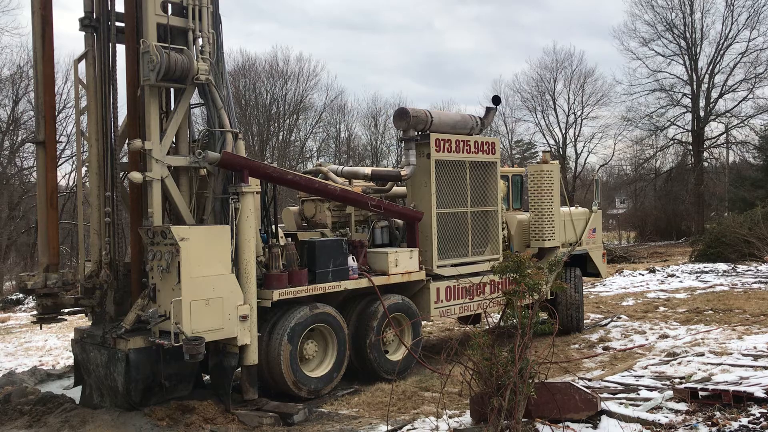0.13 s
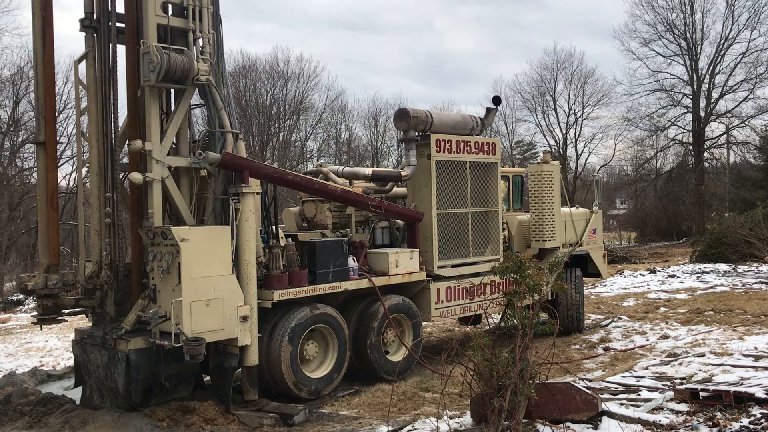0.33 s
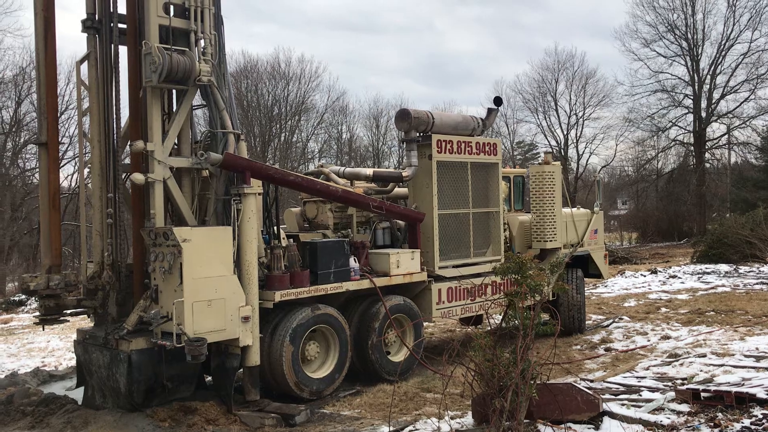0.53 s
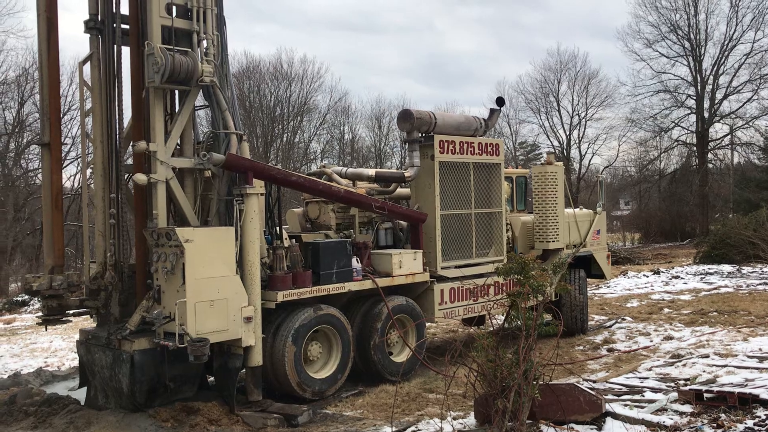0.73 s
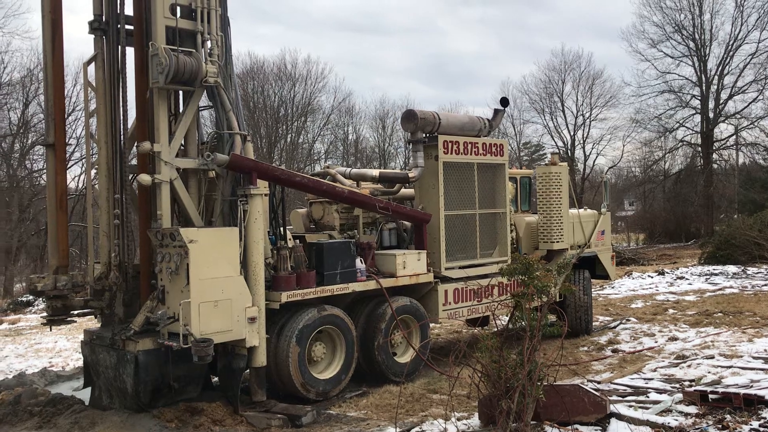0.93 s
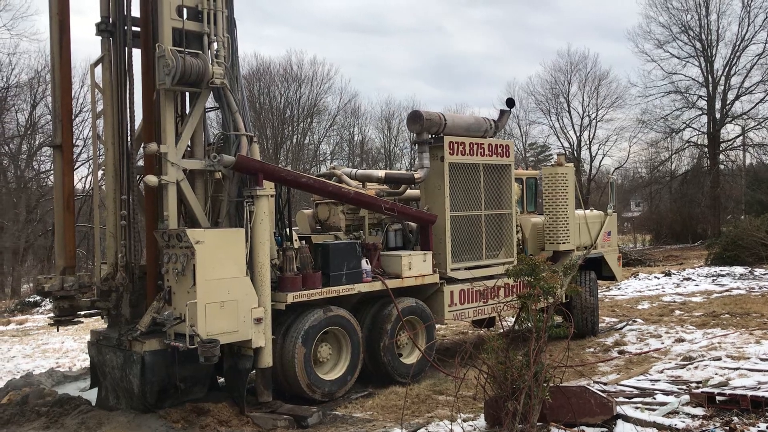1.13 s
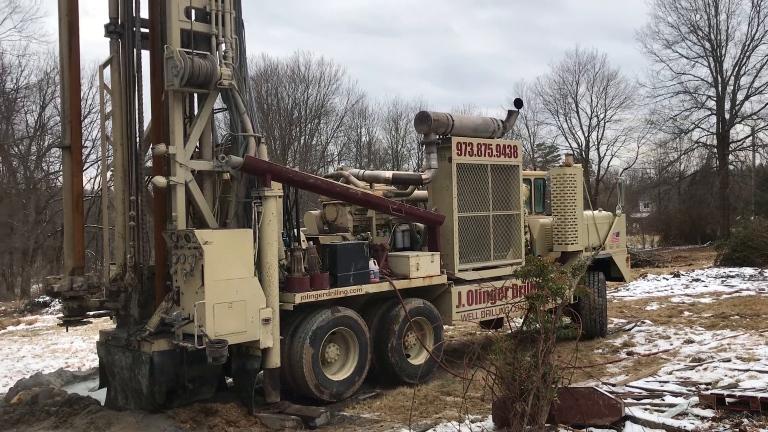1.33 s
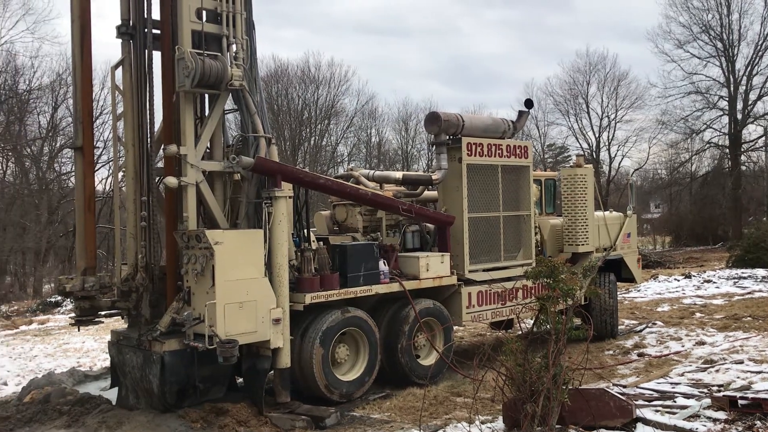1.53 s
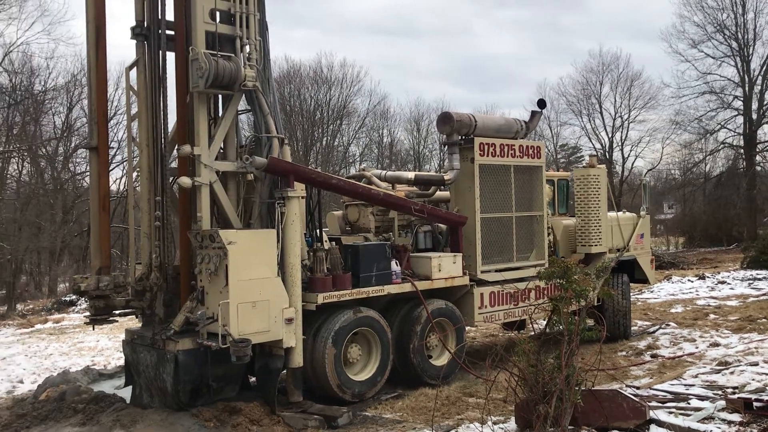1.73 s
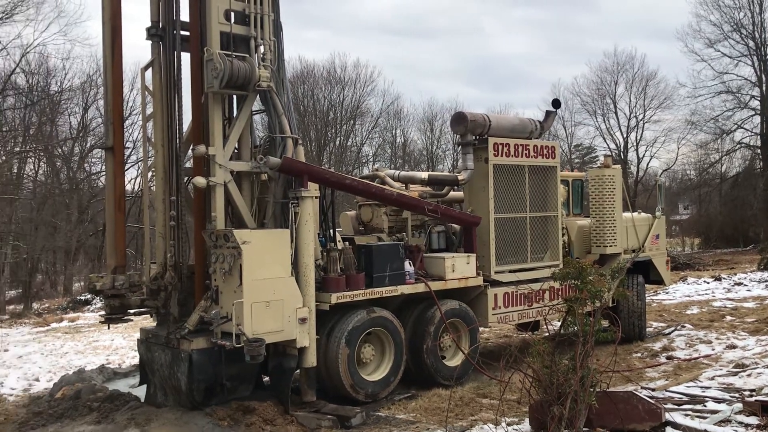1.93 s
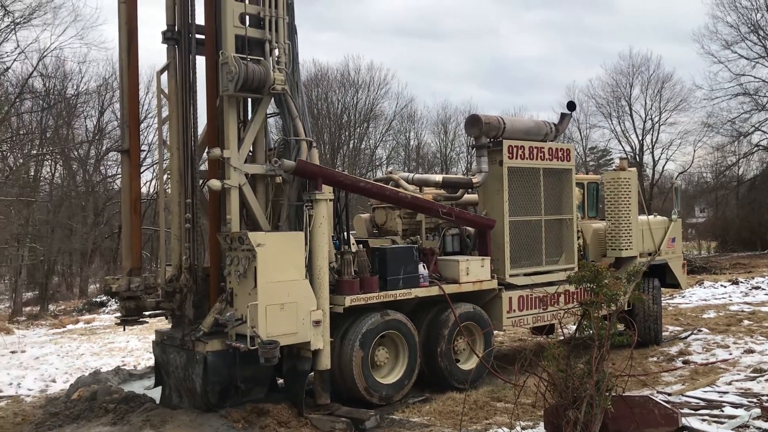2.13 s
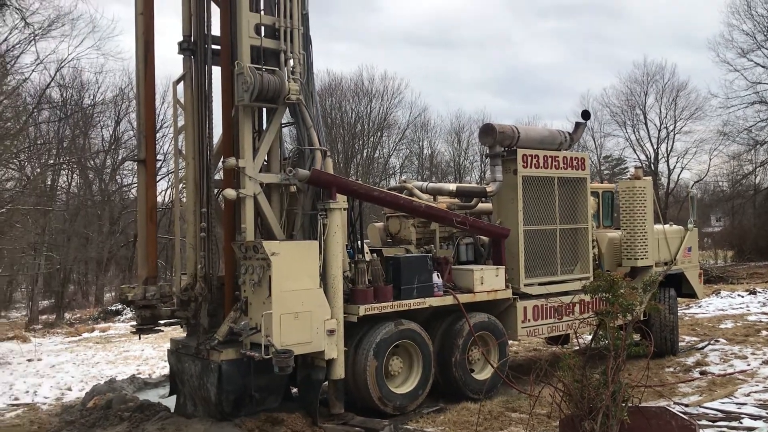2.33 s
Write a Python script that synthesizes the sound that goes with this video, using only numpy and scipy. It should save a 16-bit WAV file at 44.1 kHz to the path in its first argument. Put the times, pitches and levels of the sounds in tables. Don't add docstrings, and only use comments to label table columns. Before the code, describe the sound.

A drill rig's loud diesel drone and broad machinery roar, with steel knocking, ringing and brief squeals

```python
import sys
import numpy as np
from scipy import signal
from scipy.fft import rfft, irfft
from scipy.io import wavfile
from scipy.ndimage import uniform_filter1d

SR = 44100
rng = np.random.default_rng(int(sys.argv[2]) if len(sys.argv) > 2 else 0)


def volts_from_db(level):
    exponent = np.asarray(level, float) / 20
    return 10 ** exponent


def wav_out(sig):
    wavfile.write(sys.argv[1], SR, np.round(np.clip(np.atleast_2d(sig).T, -1, 1) * 32767).astype(np.int16))


N = 110250


def level(x, db):
    return x * volts_from_db(db) / np.sqrt(np.mean(x ** 2))


def walk(rate):
    hold = int(SR / rate)
    steps = np.repeat(rng.standard_normal(N // 200), hold)[:N + hold]
    smooth = uniform_filter1d(uniform_filter1d(steps, hold), hold)
    return 1.328 * smooth[:N]


def ring(x, hz, t60):
    pole = np.exp(2j * np.pi * hz / SR - np.log(1000) / (t60 * SR))
    return signal.lfilter([1], [1, -pole], x).imag


def band(x, hz, width_hz):
    return signal.lfilter(*signal.iirpeak(hz, hz / width_hz, fs=SR), x)


def random_ticks(per_s, spread_db, chance):
    return (chance[0] < per_s / SR) * volts_from_db(-spread_db * np.log(chance[1] + 1e-9))


# (frequency [Hz], spectral level [dB per Hz])
ROAR_SPECTRUM = [(15, -58), (25, -26), (150, -7), (394, -3.5), (655, -4.5), (833, -8), (1090, -8.5),
                 (13800, -21), (15000, -32.5)]
# (frequency [Hz], width [Hz], gain [dB])
BODY_RESONANCES = [(314, 85, 6.5), (412, 180, -6.5), (682, 250, 3), (810, 143, -3), (1190, 560, 5),
                   (2130, 490, -1.5), (2770, 400, 6), (5000, 460, -3.5), (6920, 460, 5), (7800, 140, -4),
                   (10350, 290, -11), (11440, 660, 5), (12600, 1600, -5), (14230, 1340, 9.5)]


def roar(phase):
    swell_db, shared_db, flicker_db = .3, .5, 1
    throb_db, blow_scatter_db, blow_fade_cycles = 2.5, -2, 0.18
    f = np.arange(N // 2 + 1) * SR / N + 1
    hz, db = np.array(ROAR_SPECTRUM).T
    colour = np.interp(np.log(f), np.log(hz), db)
    for hz, width_hz, gain_db in BODY_RESONANCES:
        colour = colour + gain_db * np.exp(-2 * ((f - hz) / width_hz) ** 2)
    spectrum = rfft(rng.standard_normal(N)) * volts_from_db(colour)
    third_octave = 3 * np.log2(f / 20)
    swell = swell_db * walk(3.6)
    shared = [shared_db * walk(19.0) for _ in range(7)]
    puff = uniform_filter1d(np.exp(-phase / blow_fade_cycles), 88)
    throb = throb_db * puff * volts_from_db(blow_scatter_db * walk(18))
    out = 0
    for k in range(31):
        part = irfft(spectrum * np.clip(1 - np.abs(third_octave - k), 0, 1), N)
        throb_share = np.exp(-((k - 20) / 11.7) ** 2)
        out = out + part * volts_from_db(swell + shared[k // 5] + flicker_db * walk(24.63) + throb * throb_share)
    return level(out, -16.5)


def clatter():
    chance = rng.random((3, N))
    ticks = random_ticks(400, 2, chance) * np.sign(chance[2] - .5)
    return level(band(band(ticks, 1300, 1600), 1300, 2400), -28)


# (frequency [Hz], rms level [dB], pitch wander [Hz])
PUMP_TONES = [(111.1, -37.5, .2), (552.83, -29, .05), (558.05, -35.5, .05), (645, -28.5, .5),
              (650, -35, .5), (659.2, -35, .6), (693.6, -34, .2), (710.2, -34, .6), (723, -38, 1),
              (737.8, -38, 1), (439.5, -42, .5), (228, -39, .3), (1096, -37, 1.5), (2265, -38, .6)]


def pumps():
    out = 0
    for hz, db, wander_hz in PUMP_TONES:
        strength = volts_from_db(db + 1.3 * walk(25.1))
        pitch = hz + wander_hz * walk(5.02)
        out = out + strength * np.sqrt(2) * np.sin(2 * np.pi * np.cumsum(pitch) / SR)
    return out


# (time [s], cycle rate [Hz])
ENGINE_SPEED = [(0, 16.85), (.6, 16.875), (1.1, 16.905), (1.5, 16.925), (2.5, 16.93)]
# (multiple of the cycle rate, level [dB])
ENGINE_HARMONICS = [(2, -28), (3, -26), (4, -18), (6, -17.5), (8, -14), (9, 0), (10, -4.5), (11, -15),
                    (12, -2.5), (14, -8), (16, -7), (17, -20), (18, -6), (19, -17), (20, -9), (21, -19),
                    (26, -17), (28, -19)]


def engine():
    pipe_dispersion, pipe_order, pipe_turn = 1.85, 9.503, .74
    echo_share, echo_cycles = .6, .375
    cycle_hz = np.interp(np.arange(N) / SR, *np.array(ENGINE_SPEED).T)
    turn = 2 * np.pi * np.cumsum(cycle_hz) / SR
    out = 0
    for order, db in ENGINE_HARMONICS:
        pipe_lag = pipe_dispersion * (order - pipe_order) ** 2 + pipe_turn
        echo_lag = echo_share * np.cos(2 * np.pi * echo_cycles * (order - 10))
        out = out + volts_from_db(db + walk(5.77)) * np.sin(order * turn + pipe_lag + echo_lag)
    return volts_from_db(-23) * out


def hammer_phase():
    blow_hz, start_s = 29.3, .003
    return (np.cumsum(blow_hz * (1 + .004 * walk(3))) / SR - start_s * blow_hz) % 1


def blow_instants(phase):
    return np.diff(phase, prepend=0) < 0


# (frequency [Hz], rms level [dB], t60 [s])
THUMP_MODES = [
    (673, -32, 0.035),
    (1076, -34, 0.073),
    (1348, -36.5, 0.1),
]


def hammer(phase):
    blows = blow_instants(phase)
    out = 0
    for hz, db, t60 in THUMP_MODES:
        strength = volts_from_db(2.5 * rng.standard_normal(N)) * np.sign(rng.standard_normal(N))
        out = out + level(ring(blows * strength, hz, t60), db)
    return out


def thud(db, hz):
    t = np.arange(SR // 5) / SR
    rise_s, tone_fade_s, t60_s, crack_hz = 0.00067, 0.0031, 0.11, 3270
    noise = rng.standard_normal(len(t))
    body = level(band(noise, hz, 0.51 * hz), 0)
    tone = np.sin(2 * np.pi * hz * t) * np.exp(-t / tone_fade_s)
    crack = level(band(band(noise, crack_hz, 3800), crack_hz, 3800), -11)
    envelope = volts_from_db(db - 10.5 - 60 * t / t60_s) * (1 - np.exp(-t / rise_s))
    return (body + tone + crack) * envelope


# (time [s], level [dB])
ROCK_PRESSURE = [(0.12, -25), (0.42, -24), (0.455, -20), (0.6, -27.5), (0.66, -25), (0.99, -25),
                 (1.11, -23.5), (1.15, -23), (1.77, -26), (1.88, -35), (1.92, -24), (2.29, -23),
                 (2.48, -25.5), (2.5, -34)]
# (time [s], peak level [dB], centre frequency [Hz])
HARD_KNOCKS = [(0.1711, -10, 1070), (0.2057, -5, 1060), (0.2368, -4, 1100), (0.307, -5, 1020),
               (0.3734, -10, 1120), (0.4072, -8.5, 2800), (0.449, -5, 1250), (0.4544, -1, 1400),
               (0.55, -14, 1300), (0.649, -15, 1230), (0.7596, -17, 2690), (0.8213, -6.5, 2400),
               (0.8517, -12, 1150), (0.858, -5.5, 2300), (0.925, -10, 2500), (1.0986, -12, 1160),
               (1.1301, -18, 1100), (1.1646, -2.5, 1030), (1.3024, -13, 1120), (1.3406, -21, 2750),
               (1.3643, -7.5, 1090), (1.4083, -5, 970), (1.4465, -2, 1170), (1.47, -11, 1000),
               (1.5047, -3, 1450), (1.5475, -4.5, 1030), (1.577, -4.5, 1280), (1.7427, -6, 1030),
               (1.777, -4, 1170), (1.9, -4.5, 1220), (1.9815, -9, 1170), (2.011, -5, 1270),
               (2.0478, -5, 1010), (2.1832, -8, 1060), (2.2213, -7.5, 1420), (2.25, -10, 1040),
               (2.322, -9, 1350), (2.353, -18, 1110), (2.3857, -5.5, 1090)]
STRING_HZ = [1437, 1963, 2266, 2280, 2628, 2695, 3372, 3804, 4463, 5362, 5573, 6014, 6112, 8152]
# (level [dB], t60 [s])
STRING_MODES = [(-10, .15), (-13, .2), (-16, .4), (-14.5, .15), (-13, .2), (-13, .3), (-13, .1), (-16, .2),
                (-16, .12), (-18, .25), (-17, .14), (-19.5, .15), (-33, .23), (-21, .2)]
CASING_HZ = [1003, 1200, 1292, 1534, 1665, 1900, 2493, 2869, 3214, 4610, 5042, 5152, 7091, 12040]
# (level [dB], t60 [s])
CASING_MODES = [(-10.5, 0.54), (-12, .15), (-9, 0.15), (-12.5, 0.21), (-13.5, 0.27), (-10.5, 0.059),
                (-10.5, 0.086), (-17.5, 0.33), (-17, 0.098), (-25, 0.12), (-19, 0.24), (-36, .2),
                (-36, 0.086), (-27, .1)]


def drill_string(phase):
    rattle_db, knock_ring_db, wander_db = 1.5, -33, 1.5
    press = np.interp(np.arange(N) / SR, *np.array(ROCK_PRESSURE).T)
    blows = blow_instants(phase) * volts_from_db(12)
    knocks, out = np.zeros(N), np.zeros(N)
    for at, db, hz in HARD_KNOCKS:
        i = int(at * SR)
        knocks[i] = volts_from_db(db)
        hit = thud(db, hz)[:N - i]
        out[i:i + len(hit)] += hit
    for hz, (db, t60) in zip(STRING_HZ + CASING_HZ, STRING_MODES + CASING_MODES):
        chance = rng.random((3, N))
        impacts = random_ticks(1500, 2, chance) + blows
        drive = impacts * (2 * chance[2] - 1) * volts_from_db(press + wander_db * walk(8.24))
        rattle = level(ring(drive, hz, t60), db + rattle_db + np.mean(press))
        knock_ring = volts_from_db(db + knock_ring_db) * ring(knocks * chance[2], hz, t60)
        out = out + rattle + knock_ring
    return out


SQUEAL_ONSETS = [.13, .485, .685, .89, 1.07, 1.6, 2.24, 2.42, .49, .55, .85, 1.6, 1.88, 2, 2.05, 2.21, 2.39,
                 1.44, 2.02, .13, .7, .86, 1.33, 1.95, 2.08, 2.19, .453, 1.47, .47, .65, .94, 1.16, 1.45,
                 .45, .52, .83, .47]
SQUEAL_PITCHES = [6720, 6802, 6802, 6802, 6802, 6790, 6800, 6820, 5575, 5575, 5545, 5575, 5575, 5575, 5575,
                  5575, 5580, 6015, 6015, 8153, 8153, 8153, 8153, 8230, 8153, 8153, 1440, 1450, 2695, 2695,
                  2696, 2697, 2695, 2268, 2265, 2266, 2630]
# (length [s], level [dB])
SQUEAL_BURSTS = [(0.072, -34), (0.048, -30), (0.032, -24), (0.077, -29), (0.042, -25.5), (.18, -41),
                 (0.052, -44), (0.025, -42), (0.03, -32), (.02, -28), (.04, -29), (0.11, -32.5),
                 (0.04, -30), (.025, -33), (0.11, -30), (.06, -37), (0.052, -29), (0.15, -35), (.06, -34),
                 (.12, -40), (0.11, -38.5), (.08, -31), (0.22, -39), (.06, -40), (.05, -39), (0.07, -33),
                 (0.011, -17.5), (0.071, -21), (0.16, -24.5), (0.18, -27), (0.041, -23), (0.055, -20.5),
                 (0.16, -24), (0.035, -21.5), (.24, -29.5), (0.081, -29), (.13, -33)]


def squeal():
    rise_s, fade_s, pair_split, pitch_wander = .015, 0.038, .006, 0.00066
    t, out = np.arange(N) / SR, 0
    for at, hz, (length, db) in zip(SQUEAL_ONSETS, SQUEAL_PITCHES, SQUEAL_BURSTS):
        rise = np.clip((t - at) / min(rise_s, length / 3), 0, 1)
        press = rise * np.exp(-np.clip(t - at - length, 0, None) / fade_s)
        paired = 6500 < hz < 7000
        rough_db = 4 if paired else 1.5
        for side in (-1, 1) if paired else (0,):
            pitch = hz * (1 + side * pair_split + pitch_wander * walk(61.3))
            strength = volts_from_db(db + rough_db * walk(50.65)) * press
            out = out + strength * np.sin(2 * np.pi * np.cumsum(pitch) / SR)
    return out


def scene():
    phase = hammer_phase()
    mix = roar(phase) + clatter() + pumps() + engine() + hammer(phase) + drill_string(phase) + squeal()
    return np.array([mix, mix])


def top_cut(x):
    return signal.sosfilt(signal.butter(12, 16100, fs=SR, output="sos"), x)


def record(dry):
    start_s, limit, top_hz = .1204, 1.6, 15000
    is_open = np.arange(N) >= start_s * SR
    held = limit * np.tanh(dry / limit) * is_open
    low_pass = signal.ellip(12, .3, 70, top_hz, fs=SR, output="sos")
    mix = signal.sosfilt(low_pass, held)
    return top_cut(mix)


dry = scene()
out = record(dry)
wav_out(out)
```